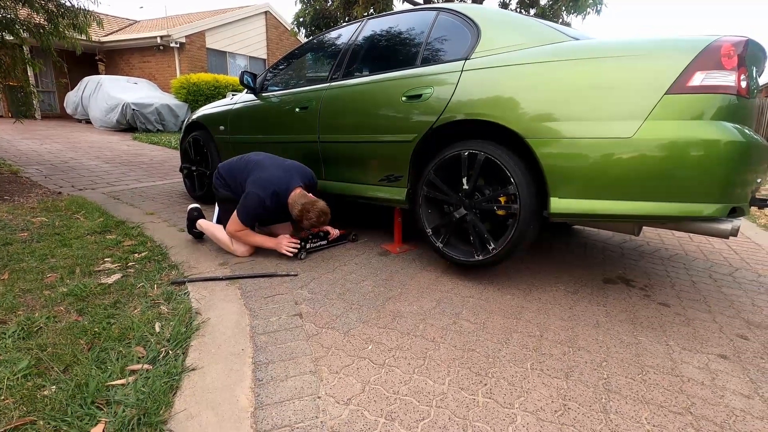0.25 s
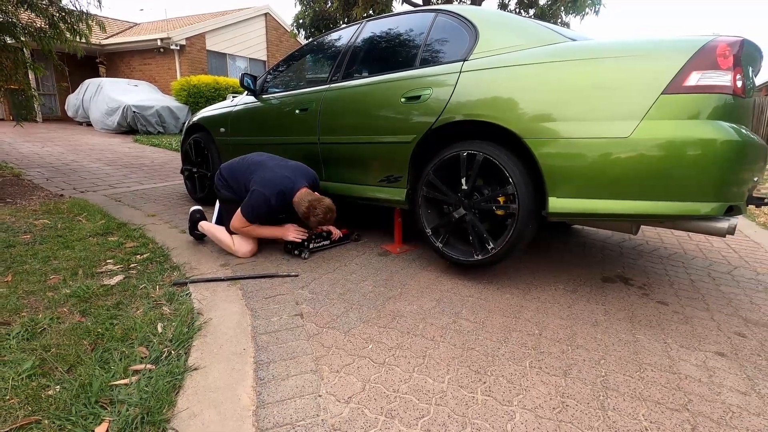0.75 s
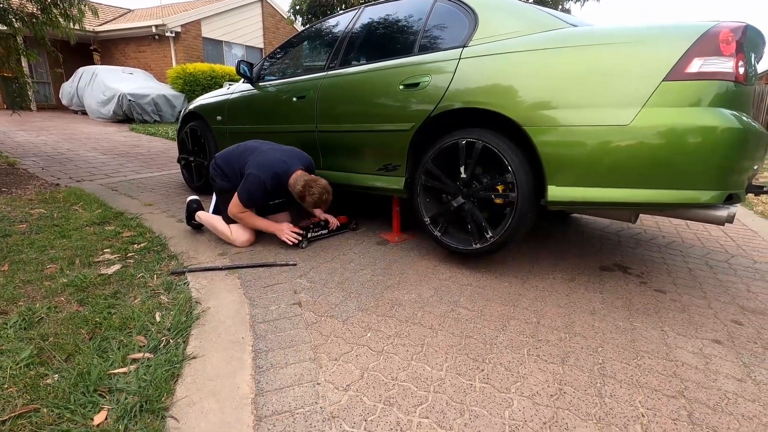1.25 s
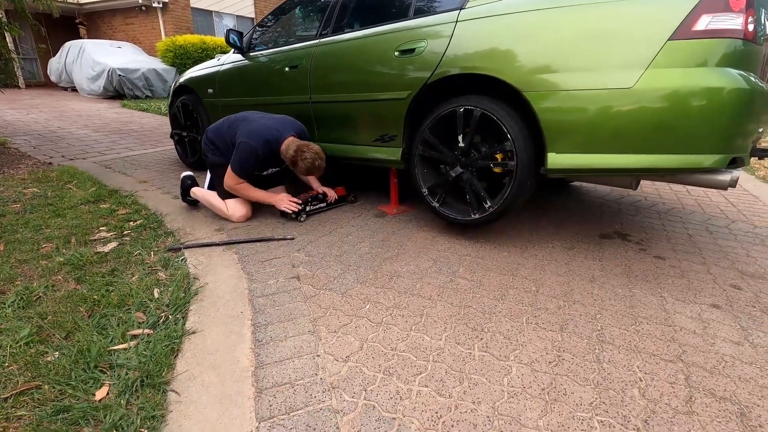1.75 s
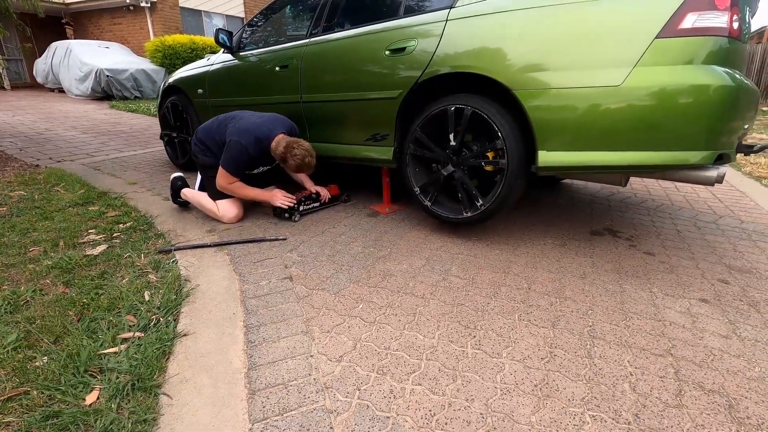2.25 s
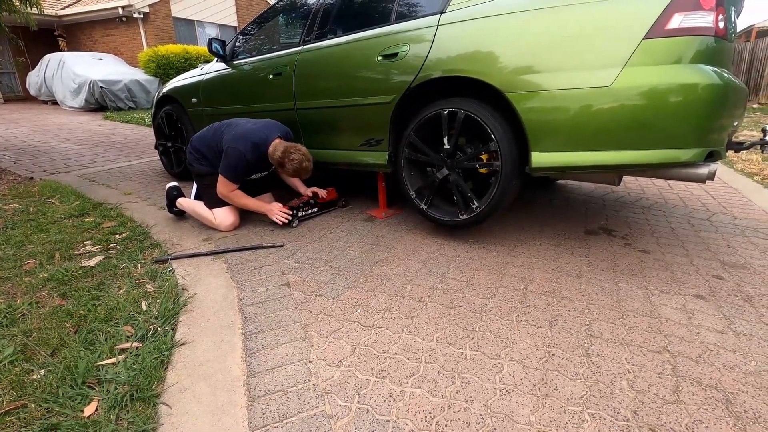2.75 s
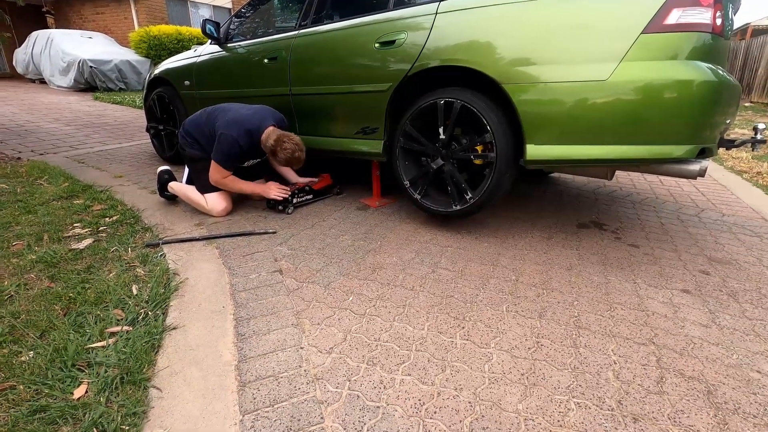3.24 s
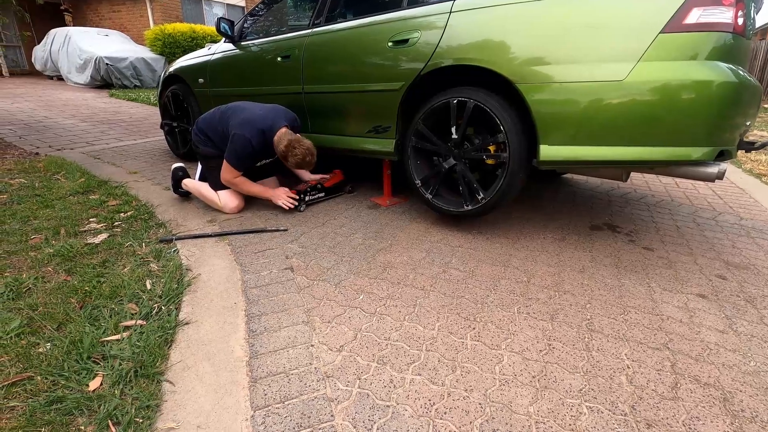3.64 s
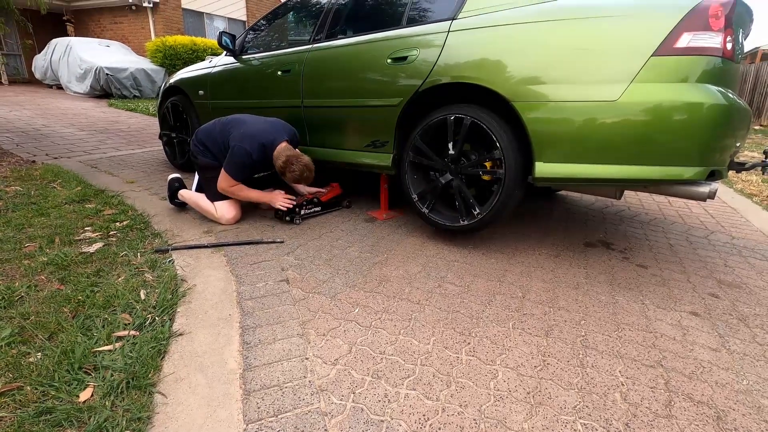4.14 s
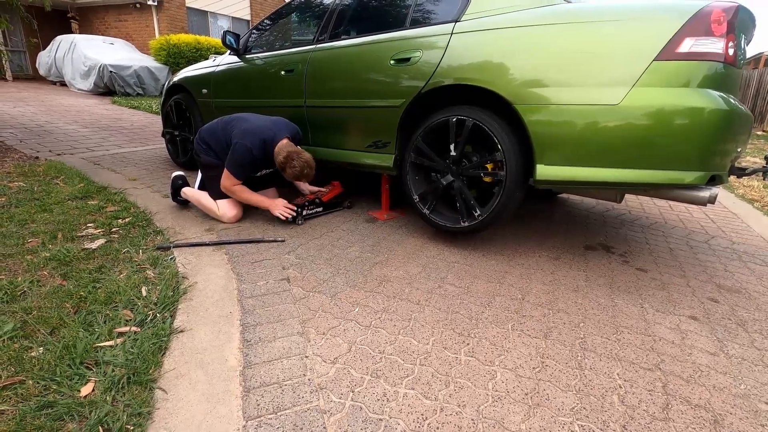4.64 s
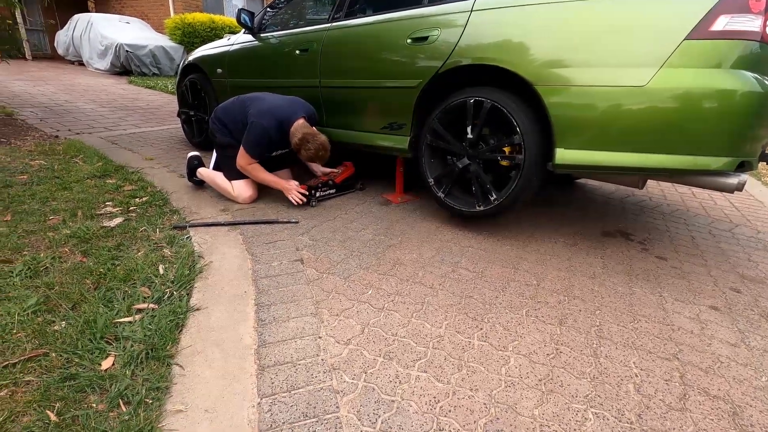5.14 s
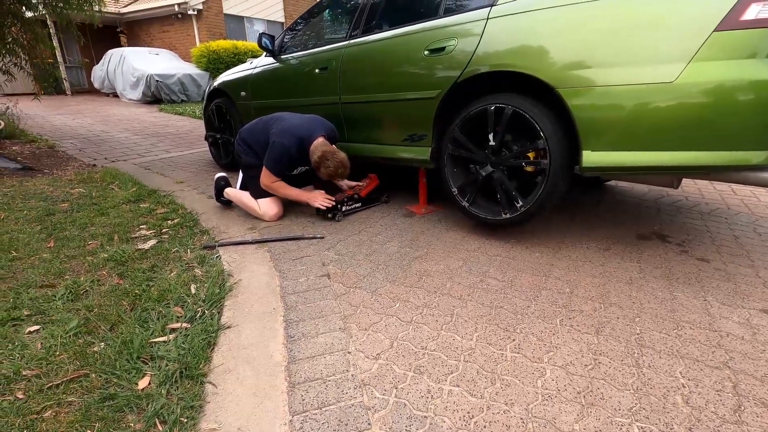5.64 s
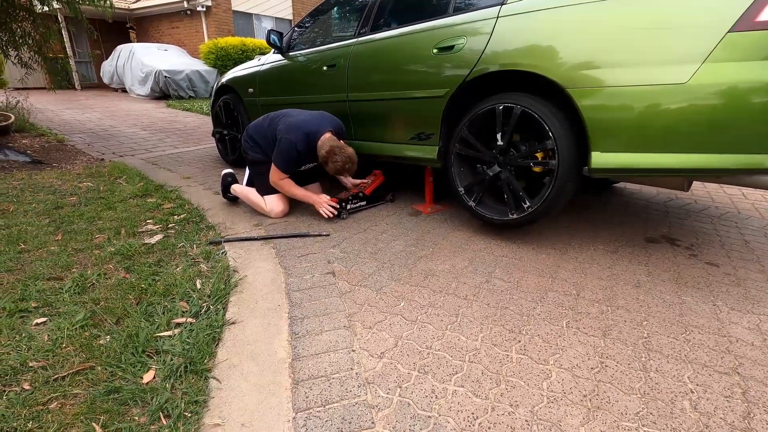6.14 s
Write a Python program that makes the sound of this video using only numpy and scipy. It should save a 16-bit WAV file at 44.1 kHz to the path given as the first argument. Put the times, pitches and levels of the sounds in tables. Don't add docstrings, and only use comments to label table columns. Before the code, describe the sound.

Close by on a paved drive, a loose steel jack part clacks, ticks and rattles unevenly while soft wind buffets and a far engine fades.

```python
import sys
import numpy as np
from scipy import signal
from scipy.fft import rfft, irfft
from scipy.io import wavfile
from scipy.ndimage import uniform_filter1d

SR = 44100
rng = np.random.default_rng(int(sys.argv[2]) if len(sys.argv) > 2 else 0)


def invert_db(x):
    u = np.asarray(x, float) / 20
    return 10 ** u


def unload_wav(signal):
    wavfile.write(
        sys.argv[1],
        SR,
        np.round(np.clip(np.atleast_2d(signal).T, -1, 1) * 32767).astype(np.int16),
    )


N = 281799


def evened(x):
    return x / np.sqrt(np.mean(x ** 2) + 1e-20)


def steady(x, size):
    return x / np.sqrt(abs(uniform_filter1d(x ** 2, size=size)) + 0.1)


def read(points, hz):
    f, value = np.transpose(points)
    return np.interp(np.log(hz + 1), np.log(f + 1), value)


def level_curve(points):
    s, db = np.transpose(points)
    return np.interp(np.arange(N) / SR, s, db)


def coloured(x, points):
    hz = np.fft.rfftfreq(x.shape[-1], 1 / SR)
    return evened(irfft(rfft(x) * invert_db(read(points, hz)), x.shape[-1]))


def add(mix, s, sound):
    part = mix[round(s * SR):][:len(sound)]
    part += sound[:len(part)]


def ring(t, hz, t60, rise):
    t = np.maximum(t, 0)
    return (1 - np.exp(-t / rise)) * invert_db(-60 * t / t60) * np.sin(2 * np.pi * hz * t)


def swell(start, length):
    return np.sin(np.pi * np.clip((np.arange(N) / SR - start) / length, 0, 1)) ** 0.5


# (frequency [Hz], level [dB])
AIR_COLOUR = [(24, -15), (45, -2), (70, -12), (118, -9), (308, -16), (1030, -22), (1990, -24), (2800, -31),
              (7000, -37), (9500, -37.5), (15700, -46.5), (16150, -83)]


def hush():
    frames, hz = N // 256 + 5, np.fft.rfftfreq(1024, 1 / SR)
    a, b, patches = rng.standard_normal((frames, 513, 3)).T
    patches = uniform_filter1d(patches, size=12, axis=0)
    patches = evened(uniform_filter1d(patches, size=10, axis=1))
    spectra = (a + 1j * b) * invert_db(read(AIR_COLOUR, hz)[:, None] + 2 * patches)
    air = signal.istft(spectra, nperseg=1024, noverlap=768)[1][:N]
    level_db = -56 - 0.28 * np.arange(N) / SR
    return invert_db(level_db) * evened(air)


# (time [s], slow pressure level [dB])
WIND_LEVEL = [(0, -31), (.7, -30), (.9, -20), (1.3, -20), (1.6, -27), (2.05, -42), (2.3, -31), (2.65, -47),
              (3.1, -25), (3.45, -39), (3.7, -30), (4.0, -34), (4.3, -28), (4.7, -29), (5.0, -38),
              (5.3, -34), (5.6, -41), (6.39, -37)]


def wind():
    swing_colour = [(0.3, -30), (1.5, -4), (4, 0), (8, -9), (14, -28), (60, -150)]
    buffet_colour = [(6, -63), (14, 13), (25, -2), (45, -14), (90, -27), (900, -150)]
    swing = steady(coloured(rng.standard_normal(N), swing_colour), size=20000)
    swing = signal.oaconvolve(swing, np.hanning(1500) / 750, "same")
    buffet = steady(coloured(rng.standard_normal(N), buffet_colour), size=9000)
    wind_db = level_curve(WIND_LEVEL)
    buffet_db = -54.5 + 1.55 * (wind_db - np.mean(wind_db))
    settle = np.minimum(np.arange(N) / (0.05 * SR), 1)
    return settle * (invert_db(wind_db) * swing + invert_db(buffet_db) * buffet)


# (time [s], level [dB])
ENGINE_LEVEL = [(0, -58.5), (.7, -64.5), (1.4, -52.5), (2, -56), (2.7, -58.5), (3.5, -65), (4.4, -64),
                (5.2, -69.5), (6.39, -68)]
# (multiple, start [s], length [s], level [dB])
ENGINE_ORDERS = [
    (1.5, 0.48, 1.82, -66),
    (2, 0.78, 1.95, -68),
    (3, 1.46, 1.9, -72),
    (2, 3.3, 1.73, -71),
    (2, 4.73, 3.5, -67.5),
    (1.5, 3.7, 2.3, -73.5),
]
# (start [s], length [s], frequency [Hz], level [dB])
FAR_HUMS = [
    (0, 1.63, 221.8, -69.5),
    (0, 0.91, 163, -64),
    (0, 0.47, 110, -60),
    (2.003, 0.63, 156, -63),
    (0, 1, 299, -76),
    (6.047, 0.3, 68, -60.5),
]


def drone():
    t = np.arange(N) / SR
    firing_hz = 141.57 - 5.544 * t
    turns = np.cumsum(firing_hz) / SR
    flutter = uniform_filter1d(rng.standard_normal((3, N)), size=5000)
    flutter = evened(uniform_filter1d(flutter, size=5000))
    calm, order_flutter, hum_flutter = invert_db(np.array([[1.1], [2.5], [2.5]]) * flutter)
    engine = invert_db(level_curve(ENGINE_LEVEL)) * np.sin(2 * np.pi * turns)
    overtones, hums = np.zeros(N), np.zeros(N)
    for multiple, s, length, db in ENGINE_ORDERS:
        overtones += invert_db(db) * swell(s, length) * np.sin(2 * np.pi * multiple * turns)
    for s, length, hz, db in FAR_HUMS:
        hums += invert_db(db) * swell(s, length) * np.sin(2 * np.pi * hz * t)
    return np.sqrt(2) * (calm * engine + order_flutter * overtones + hum_flutter * hums)


# (time [s], peak level [dB], frequency [Hz], t60 [s])
FAR_THUMPS = [
    (2.267, -49.5, 58.6, 0.82),
    (2.69, -42.5, 65.6, 0.31),
    (3.637, -44.5, 59.9, 0.96),
    (3.969, -47, 60, 1),
    (4.747, -42, 59.8, 1),
    (5.22, -44, 56.7, 1),
    (6.174, -47, 99, 1),
    (6.272, -64, 67, 0.66),
]


def thumps():
    t, mix = np.arange(SR) / SR, np.zeros(N)
    for s, db, hz, t60 in FAR_THUMPS:
        sagging_hz = hz * (1 + 0.052 * np.exp(-t / 0.019))
        add(mix, s, invert_db(db - 0.5) * ring(t, sagging_hz, t60, 0.0063))
        upper_modes = ring(t, 1.68 * hz, 0.3, 0.0027) + ring(t, 3.2 * hz, 0.02, 0.003)
        add(mix, s, invert_db(db - 7) * upper_modes)
    return mix


# (time [s], length [s], start [Hz], end [Hz], level [dB])
BIRD_CHIRPS = [
    (0, .014, 6700, 6200, -62),
    (0, .07, 6800, 6950, -69),
    (.125, .04, 5800, 7350, -69),
    (.218, .025, 5600, 7100, -62),
    (.578, .014, 6100, 6900, -66),
    (.588, .03, 6900, 7050, -64),
    (.1, .04, 3400, 4200, -66),
]


def bird():
    mix = np.zeros(N)
    for s, length, start_hz, end_hz, db in BIRD_CHIRPS:
        u = np.arange(round(length * SR)) / (length * SR)
        hz = start_hz + (end_hz - start_hz) * np.sqrt(u)
        add(mix, s, invert_db(db - 3) * np.sin(np.pi * u) * np.sin(2 * np.pi * np.cumsum(hz) / SR))
    return mix


# (frequency [Hz], t60 [s])
YARD_DECAY = [(400, 0.62), (1500, 0.098), (6000, 0.21), (14000, 0.13)]


def yard(x):
    taps = np.zeros(16384)
    at = np.arange(200, 16000, 20)
    taps[at + rng.integers(0, 20, len(at))] = rng.choice([-1., 1.], len(at))
    hz, t, z = signal.stft(taps, SR, nperseg=256)
    decay = invert_db(-60 * t / read(YARD_DECAY, hz)[:, None])
    tail = signal.istft(z * decay, SR, nperseg=256)[1]
    return signal.fftconvolve(x, tail / np.linalg.norm(tail))[:N]


# (time [s], peak level [dB], frequency [Hz], t60
# [s])
SINGING_PARTS = [(.251, -38, 5900, .06), (.291, -54, 5450, 0.07), (.432, -28, 2030, 0.051),
                 (.517, -40, 9000, .021), (.524, -48.5, 5860, 0.16), (.651, -58, 5950, 0.068),
                 (.886, -44, 5700, 0.084), (1.023, -36, 11350, 0.044), (1.222, -44, 11400, .04),
                 (1.252, -51, 11300, .05), (1.296, -47.5, 11400, 0.1), (2.106, -54, 9000, 0.1),
                 (1.612, -49, 11350, 0.048), (1.05, -58, 6000, 0.081), (.906, -55, 5880, .07),
                 (3.66, -45, 1150, 0.082), (2.612, -31.5, 1924, 0.031), (2.776, -53, 11400, 0.055),
                 (3.107, -39, 11400, .05), (3.441, -57, 6000, 0.38), (3.606, -35.5, 1950, 0.048),
                 (3.756, -50, 5960, 0.28), (4.084, -47, 6010, .16), (4.391, -69, 5850, .08),
                 (4.442, -44, 11400, .04), (4.766, -47.5, 11300, 0.12), (5.169, -37, 1530, 0.021),
                 (5.176, -43, 11400, .075), (5.325, -42.5, 2136, 0.13), (5.405, -47, 5890, 0.042),
                 (5.488, -38, 11350, 0.051), (5.506, -37, 6340, 0.093), (5.871, -40, 6340, 0.032),
                 (6.138, -67, 6900, .045), (4.226, -53.5, 270, 0.27), (4.241, -53.5, 385, 0.17),
                 (4.301, -53, 316, .12), (5.487, -44.5, 377, 0.085), (5.168, -48, 467, 0.12),
                 (3.106, -51, 400, 0.06)]


def washer():
    t, mix = np.arange(8192) / SR, np.zeros(N)
    for s, db, hz, t60 in SINGING_PARTS:
        shake = invert_db(3 * evened(uniform_filter1d(rng.standard_normal(len(t)), size=200)))
        add(mix, s, invert_db(db) * shake * ring(t, hz, t60, 0.00046))
    return mix


# (frequency [Hz], level [dB])
FRAME_COLOUR = [(200, -41), (360, -6.5), (800, -4), (1200, -1.5), (1630, 2), (2740, -4), (3970, -5.5),
                (6000, -12.5), (8000, -13), (13200, -120)]
# (frequency [Hz], level [dB])
PIN_COLOUR = [(1180, -43), (2000, -38), (2950, -20.5), (4310, -17.5), (9050, -9), (9710, -10.5),
              (15800, -3.5), (16700, -57)]
# (time [s], length [s], level [dB], brightness [dB])
RUBS = [(0.148, 0.084, -64, -17), (0.268, 0.07, -67, -18), (.84, 0.079, -61, 2), (1.052, 0.064, -59, -14),
        (1.183, 0.19, -64.5, 4), (1.41, 0.089, -67, 4), (1.685, 0.094, -68, -2), (2.042, 0.094, -58, -11),
        (2.354, 0.081, -65, -7), (2.65, 0.11, -65, -1), (2.977, .09, -62, -8), (3.197, 0.12, -60.5, -8),
        (3.295, 0.17, -67, -4), (3.62, 0.086, -57, -16), (3.858, 0.1, -55, -3), (4.153, 0.19, -55.5, -12),
        (4.33, 0.097, -63.5, -21), (4.414, 0.057, -60.5, 4), (4.60, 0.12, -74, -4), (4.854, 0.11, -62, -4),
        (5.26, 0.15, -72, -4), (5.406, 0.18, -62.5, 3.5), (5.56, .10, -63, -5), (5.897, 0.097, -62, -10),
        (6.055, 0.061, -69, -16), (6.22, 0.21, -69, -10)]


def scrapes():
    grains_per_s, spread_db = 1100, 3.5
    grit = invert_db(spread_db * np.minimum(rng.exponential(1, N), 4)) * (rng.random(N) < grains_per_s / SR)
    puffs = evened(signal.oaconvolve(grit, np.exp(-np.arange(400) / 60))[:N])
    low = evened(coloured(rng.standard_normal(2 ** 19), FRAME_COLOUR)[:N] * puffs)
    high = evened(coloured(rng.standard_normal(2 ** 19), PIN_COLOUR)[:N] * puffs)
    mix = np.zeros(N)
    for s, length, db, bright_db in RUBS:
        part = slice(round(s * SR), round((s + length) * SR))
        stroke = invert_db(db) * np.hanning(len(low[part])) ** 0.52
        add(mix, s, stroke * (low[part] + invert_db(bright_db - 3.5) * high[part]))
    return mix


def uneven(x, points, depth_db, hump_hz, hump_db):
    hz = np.fft.rfftfreq(len(x), 1 / SR)
    ripple = uniform_filter1d(rng.standard_normal(len(hz)), size=60)
    ripple = evened(uniform_filter1d(ripple, size=60))
    hump = hump_db * np.exp(-(np.log((hz + 1) / (hump_hz + 1)) / 0.04) ** 2)
    return evened(irfft(rfft(coloured(x, points)) * invert_db(depth_db * ripple + hump), len(x)))


# (frequency [Hz], level [dB], t60 [s])
STEEL_MODES = [(1115, -8, .04), (1510, -10, .03), (1950, -8, .04), (2700, -12, .03), (3350, -14, .03),
               (4200, -12, .03), (5200, -12, .03), (6200, -12, .04), (7300, -12, .04), (7900, -11, .03),
               (9000, -12, .03), (11350, -10, .04), (12600, -12, .03), (850, -13, .045)]


def knock(peak_db, frame_hz, bright_db, pin_hz=0, rattle_db=-20):
    t, lead = np.arange(4096) / SR, 0.012
    after = np.maximum(t - lead, 0)
    hz, db, t60 = np.array(STEEL_MODES).T[:, :, None]
    low = hz[:, 0] < 4500
    noise, luck = rng.standard_normal((4, len(t))), rng.random((3, len(STEEL_MODES), 1))
    share = np.clip(invert_db(bright_db), 0, 0.99)
    rise = 0.0009 + 0.0034 * share ** 2

    slide = (invert_db(-23) * share ** 2 + invert_db(-34)) * np.exp(-abs(t - lead) / 0.005)
    chatter = invert_db(3.2 * uniform_filter1d(noise[2:], size=60) * np.sqrt(60))
    wobble = np.sqrt(chatter)
    blow = (1 - np.exp(-after / rise)) * invert_db(-60 * after / np.array([[0.022], [0.026]]))
    rattle = invert_db(rattle_db) * (1 - np.exp(-after / 0.0064)) * invert_db(-60 * after / np.array([[0.13], [0.07]]))
    push = blow * chatter ** np.array([[0.2], [0.6]])
    push = push + (rattle + slide) * chatter ** np.array([[1.0], [1.3]])

    late = ring(after - 0.012 * luck[0] ** 2, hz * (0.985 + 0.03 * luck[1]), t60, rise)
    late = late * invert_db(db - 4 - 14 * luck[2]) * wobble[1]

    crack = uneven(noise[0], FRAME_COLOUR, 3.7, frame_hz, hump_db=8) * push[0]
    frame_ring = ring(after, frame_hz, 0.032, 1.5 * rise) * wobble[0]
    frame = 0.5 * crack + 0.5 * frame_ring + late[low].sum(axis=0)

    ping = invert_db(-4) * ring(after, pin_hz, 0.022, rise) * wobble[0]
    hiss = uneven(noise[1], PIN_COLOUR, 2.5, pin_hz, hump_db=3)
    above = 1 / (1 + (10500 / (np.fft.rfftfreq(len(t), 1 / SR) + 1)) ** 8)
    top = irfft(rfft(hiss) * above, len(t))
    top_db = 6 * share - 15.5 - 204 * after
    hiss = hiss - top + top * invert_db(top_db)
    pin = 0.73 * hiss * push[1] + ping + late[~low].sum(axis=0)
    return lead + 0.35 * rise, invert_db(peak_db) * (np.sqrt(1 - share ** 2) * frame + share * pin)


# (time [s], peak level [dB], frame ring [Hz])
FRAME_NUDGES = [(.163, -37, 1430), (0.1744, -39, 1390), (0.188, -38, 1900), (0.206, -34.5, 1800),
                (0.225, -48, 1460), (0.29, -37, 1400), (0.342, -41, 850), (.4127, -46, 2050),
                (0.6574, -46, 805), (1.5217, -35, 823), (1.639, -47, 1180), (2.292, -42, 1540),
                (2.6224, -55, 1940), (3.027, -32, 1560), (3.1467, -40, 860), (3.173, -35, 800),
                (3.379, -40, 785), (3.47, -38, 1150), (3.791, -34.5, 1920), (4.3392, -44.5, 920),
                (4.4933, -44, 1150), (4.7804, -26.5, 883), (4.8224, -38, 900), (5.056, -36, 2200),
                (5.503, -36, 3380), (5.537, -37, 2160), (6.265, -38, 2080)]
# (time [s], peak level [dB], frame ring [Hz], brightness [dB])
LIGHT_REBOUNDS = [(0.612, -34.5, 1340, -15), (0.896, -34, 850, 0.5), (1.0463, -35.5, 2090, -22),
                  (1.1, -33.5, 802, 0), (1.258, -36, 1870, -20), (1.702, -31, 840, -0.5),
                  (1.8261, -28.5, 1150, -14.5), (2.0937, -29.5, 1160, -19), (2.2468, -29.5, 910, -0.5),
                  (2.339, -43, 2000, -12), (2.6439, -38, 1930, -15), (3.259, -46, 1770, -2),
                  (3.408, -43, 1840, -7), (3.4367, -28, 1830, -9), (3.5758, -40, 1720, -7),
                  (3.7244, -38, 1130, -1), (3.885, -45, 1880, 0), (4.051, -43, 1090, -8),
                  (4.1988, -29.5, 2460, -9.5), (4.2706, -30, 790, -4.5), (4.301, -27, 860, -0.5),
                  (4.4549, -26, 2290, -9), (4.8586, -39, 1550, -19), (4.9954, -40, 1160, -6),
                  (5.1981, -32, 2370, -5), (5.581, -40, 1780, -4.5), (5.8738, -42, 1950, -6.5),
                  (5.911, -29, 2040, -8), (6.0666, -36, 2380, -16), (6.2223, -35, 2210, -9),
                  (1.173, -40, 2000, -3.5), (1.2, -42, 1900, 4), (3.823, -48, 1900, -4),
                  (3.836, -42, 1900, -4), (3.903, -43, 1910, -2.5), (4.032, -50, 1910, 0),
                  (4.527, -39, 1920, -2)]
# (time [s], peak level [dB], pin ring [Hz], rattle after the blow [dB])
PIN_TICKS = [(0.519, -23.5, 5980, -17), (0.748, -31, 8600, -16), (0.8768, -32, 6000, -0.5),
             (1.218, -27.5, 11560, -19), (1.399, -30, 8870, -23), (1.5054, -25, 9300, -27),
             (1.8098, -21.5, 8070, -34), (1.9743, -32, 12100, -11), (2.0781, -22.5, 8000, -14.5),
             (2.3519, -27, 7900, -3.5), (2.554, -33.5, 7440, -7), (2.894, -30, 7320, -23),
             (3.0104, -26.5, 6000, -14), (3.214, -32.5, 7600, -17), (3.337, -21, 8840, -17),
             (3.5375, -28.5, 7500, -21), (3.652, -30.5, 7350, -0.5), (3.854, -28, 7750, -10),
             (3.9747, -26.5, 8950, -16), (4.178, -29.5, 8700, -9), (4.533, -32, 7400, -12),
             (4.667, -28, 7360, -5), (4.8673, -28.5, 8800, -9), (4.9783, -26, 12000, -7.5),
             (5.259, -27, 7530, -10.5), (5.3954, -23.5, 8840, -10), (5.6, -27, 8950, -20),
             (5.933, -27.5, 8930, -26), (6.0516, -25.5, 8900, -14), (6.283, -25.5, 9030, -27)]
TICK_SPOTS = (850, 1430, 1950)
# (time [s], peak level [dB], frame ring [Hz], pin ring [Hz], rattle after the blow [dB])
FRAME_CLACKS = [(0.245, -19, 1770, 5850, -9), (0.6258, -16.5, 1300, 11540, -15.5),
                (1.0224, -20.5, 1860, 11520, -15), (1.1674, -32, 2120, 10800, -12.5),
                (1.233, -29, 1244, 8000, -16), (1.291, -20.5, 1030, 4700, -13.5),
                (1.451, -24.5, 1790, 7180, -12.5), (1.603, -23, 1100, 11200, -7.5),
                (1.8945, -27, 1653, 5530, -5.5), (2.1648, -29.5, 1060, 4710, -3),
                (2.3037, -22, 2100, 7170, -15), (2.4678, -26.5, 1150, 6150, -16),
                (2.6104, -23.5, 2000, 4930, -13), (2.7754, -25.5, 1242, 6240, -16.5),
                (3.421, -22.5, 1610, 4630, -5.5), (3.741, -20.5, 1070, 11400, -10.5),
                (4.239, -22, 920, 7720, -28), (4.4381, -26.5, 1140, 4800, 0),
                (5.1666, -21, 1660, 11140, -7), (5.3228, -23, 1960, 10700, -12),
                (5.4864, -15, 1620, 6270, -11), (5.8244, -14, 1520, 8900, -13),
                (6.1882, -19, 1520, 11100, -6.5), (6.349, -26, 1202, 4900, -11),
                (1.075, -38, 1900, 4340, -6.5), (1.344, -34.5, 2030, 4770, -11),
                (4.2197, -28.5, 2150, 5340, -17), (4.2916, -36, 3340, 7200, -10),
                (4.4752, -30, 1290, 5230, -18)]
# (time [s], peak level [dB], frame ring [Hz], pin ring [Hz], rattle after the blow [dB])
JOINT_KNOCKS = [(0.094, -41, 870, 5230, -13), (0.3695, -35, 1150, 9200, -22),
                (0.4319, -16.5, 1950, 7270, -16), (0.811, -24, 1950, 12040, -15.5),
                (1.7647, -28, 1240, 11100, -11), (2.033, -24, 2020, 7280, -21),
                (2.657, -23.5, 1965, 13100, -20.5), (2.967, -30, 1790, 5860, -17),
                (3.1042, -18.5, 1136, 8340, -9.5), (3.2758, -24.5, 1736, 4780, -7.5),
                (3.5964, -22, 1880, 7340, -15), (3.9125, -17, 1225, 7330, -24),
                (4.068, -19, 1186, 5990, -5.5), (4.5925, -21, 2020, 10800, -13.5),
                (4.762, -33.5, 1590, 11300, 7.5), (4.9274, -22, 2010, 7280, -12),
                (5.6588, -21, 1156, 7270, -15.5), (5.7161, -27, 3500, 7200, -16),
                (5.994, -25.5, 3500, 7350, -10.5)]


def knocks():
    clack_db, joint_db, tick_db, nudge_db = -9.5, -4.5, -0.68, -44
    blows = list(LIGHT_REBOUNDS)
    for s, db, frame_hz in FRAME_NUDGES:
        blows.append((s, db, frame_hz, nudge_db))
    for s, db, pin_hz, rattle_db in PIN_TICKS:
        blows.append((s, db, rng.choice(TICK_SPOTS), tick_db, pin_hz, rattle_db))
    for bright_db, rows in ((clack_db, FRAME_CLACKS), (joint_db, JOINT_KNOCKS)):
        for s, db, frame_hz, pin_hz, rattle_db in rows:
            blows.append((s, db, frame_hz, bright_db, pin_hz, rattle_db))
    mix = np.zeros(N)
    for s, *settings in blows:
        early, sound = knock(*settings)
        add(mix, s - early, sound)
    return mix


def scene():
    background = hush() + wind() + drone() + thumps()
    echoing = bird() + scrapes() + knocks()
    return (background + echoing + invert_db(-13) * yard(echoing) + washer())[None]


def roll_off(x):
    return signal.sosfilt(signal.butter(12, 16800, fs=SR, output="sos"), x)


def record(dry):
    edge = signal.firwin(511, 16350, window=("kaiser", 7), fs=SR)
    finished = signal.oaconvolve(dry, edge[None], "same")
    return roll_off(finished)


dry = scene()
out = record(dry)
unload_wav(out)
```